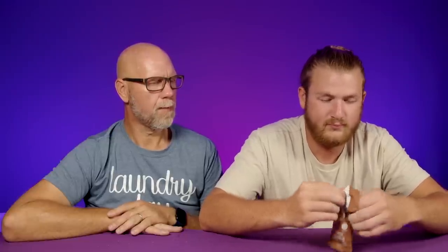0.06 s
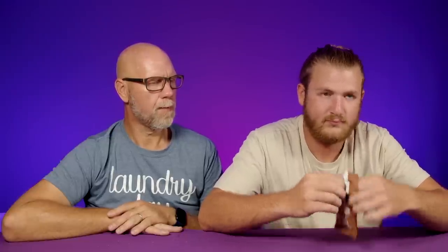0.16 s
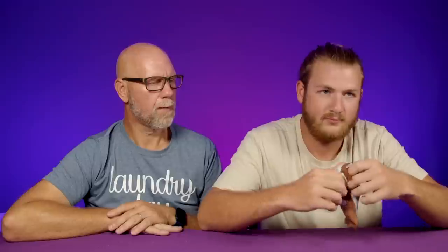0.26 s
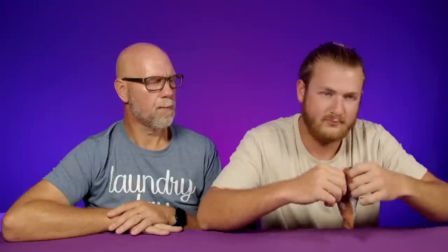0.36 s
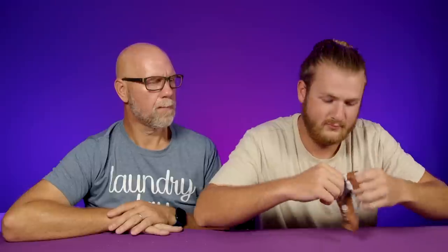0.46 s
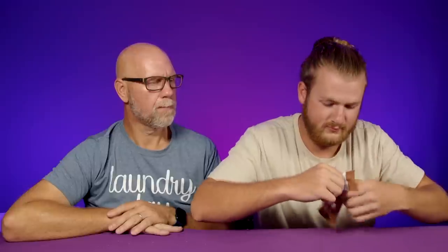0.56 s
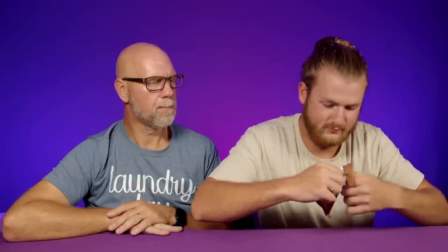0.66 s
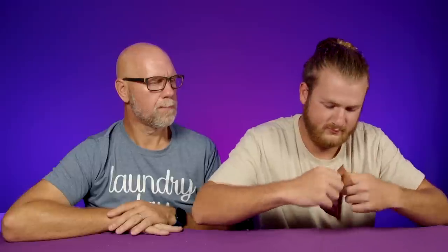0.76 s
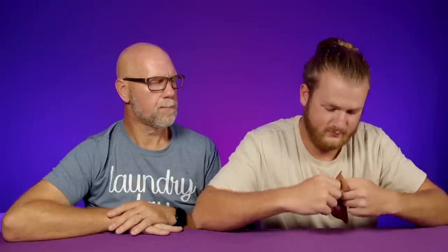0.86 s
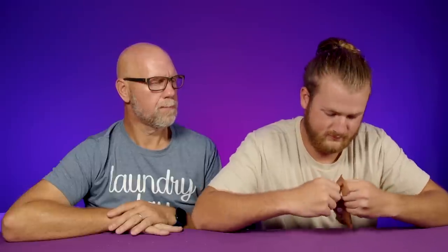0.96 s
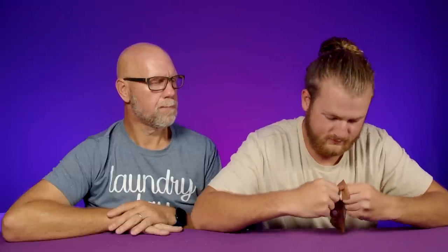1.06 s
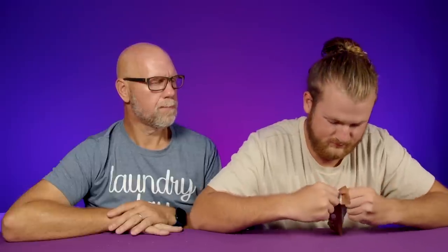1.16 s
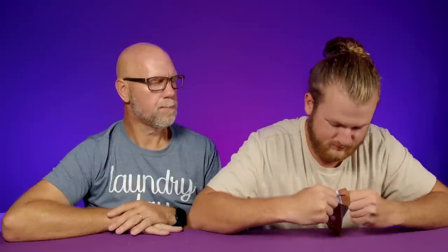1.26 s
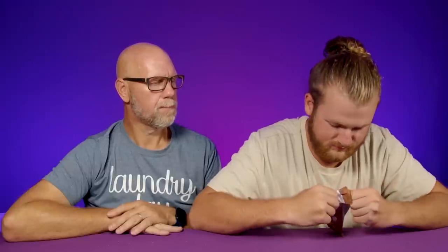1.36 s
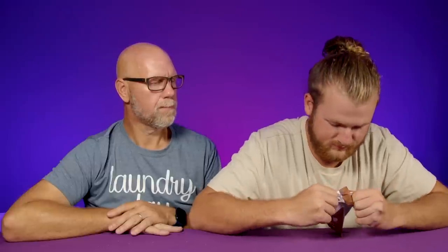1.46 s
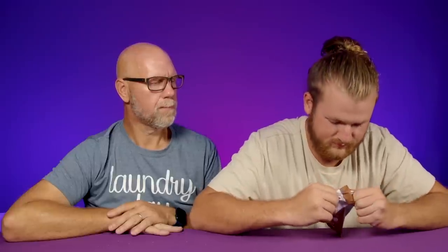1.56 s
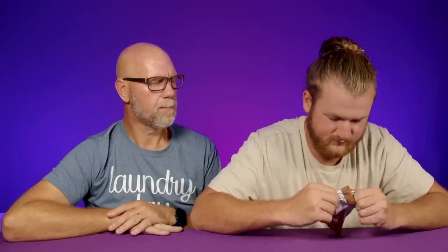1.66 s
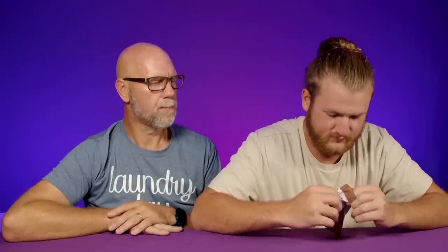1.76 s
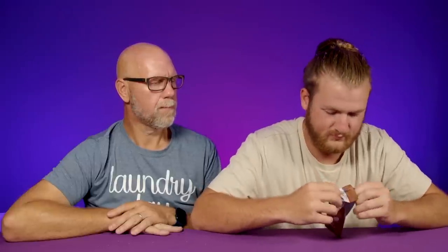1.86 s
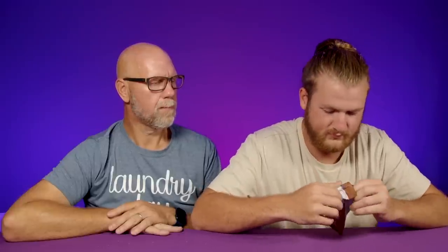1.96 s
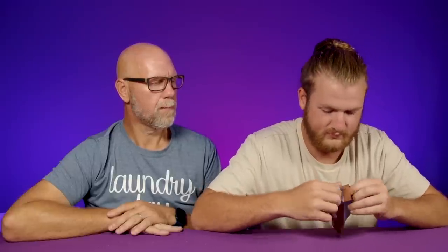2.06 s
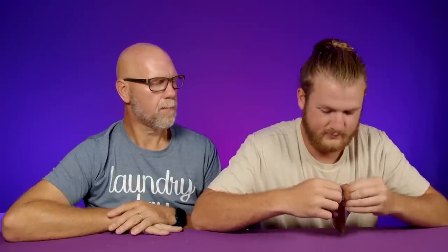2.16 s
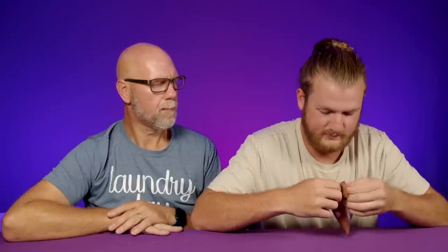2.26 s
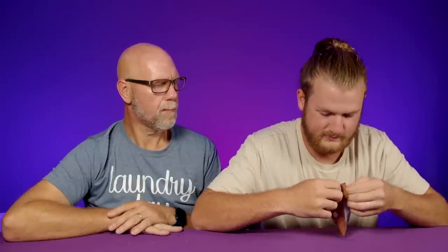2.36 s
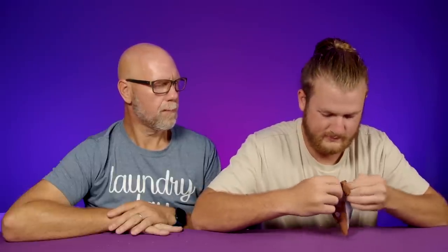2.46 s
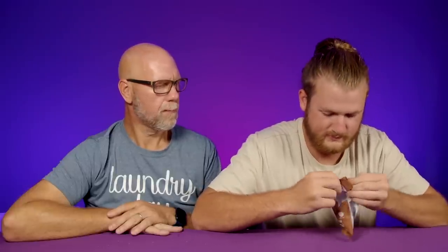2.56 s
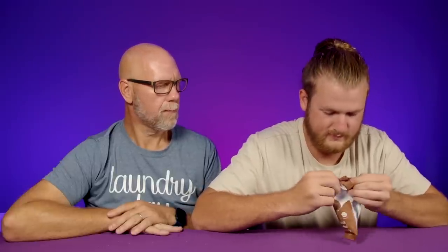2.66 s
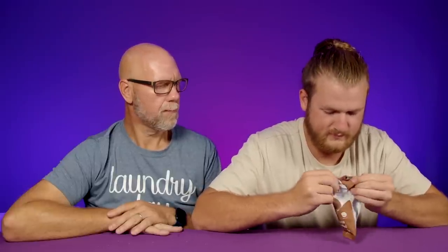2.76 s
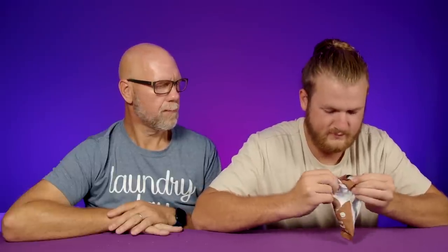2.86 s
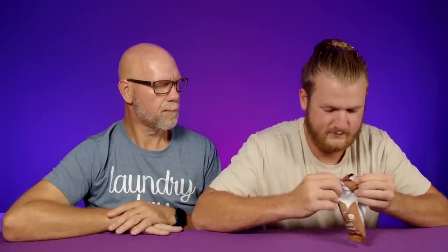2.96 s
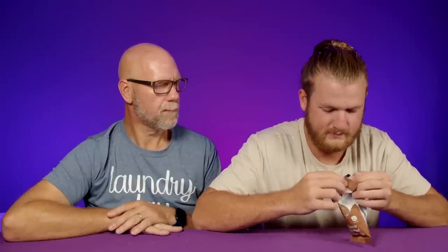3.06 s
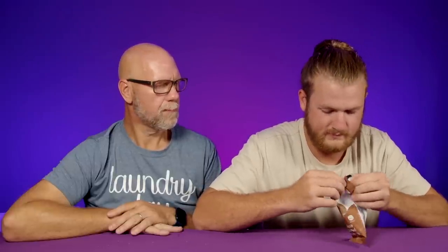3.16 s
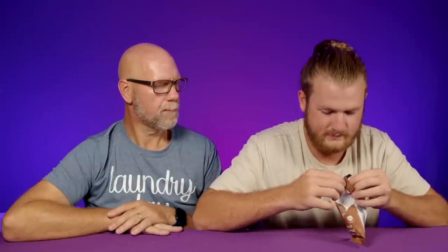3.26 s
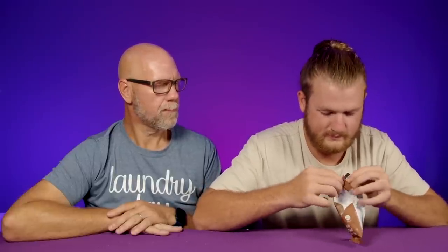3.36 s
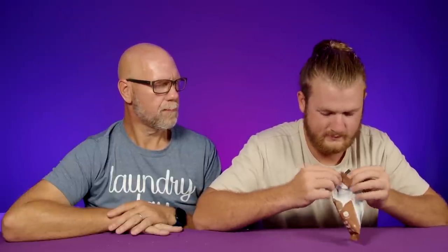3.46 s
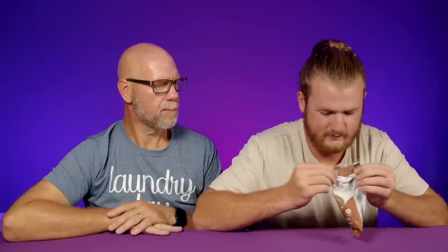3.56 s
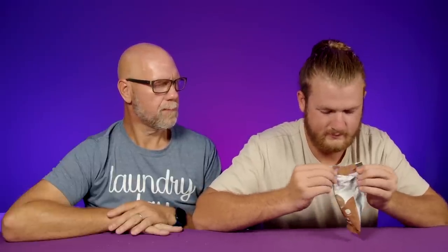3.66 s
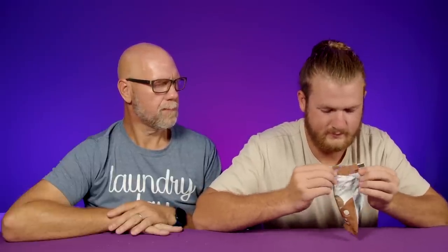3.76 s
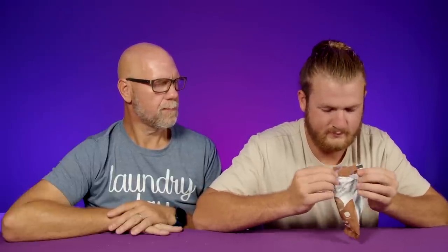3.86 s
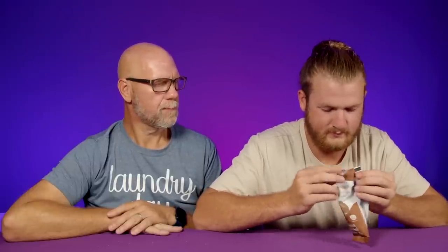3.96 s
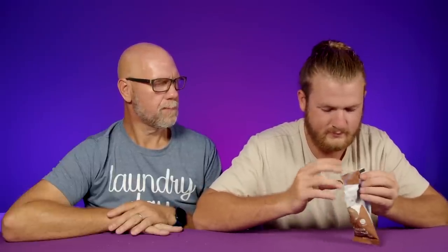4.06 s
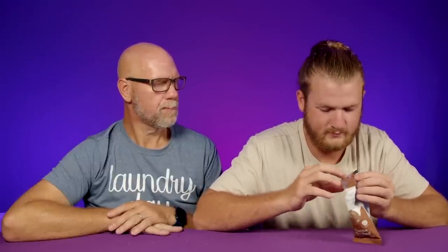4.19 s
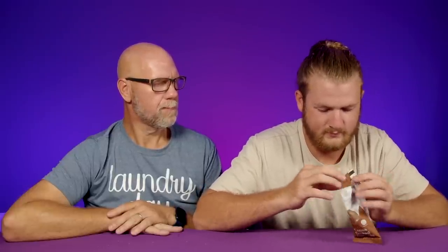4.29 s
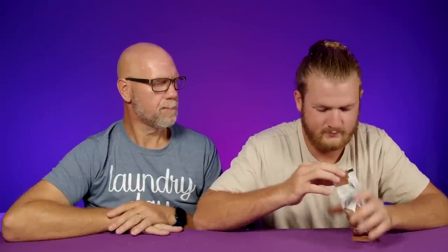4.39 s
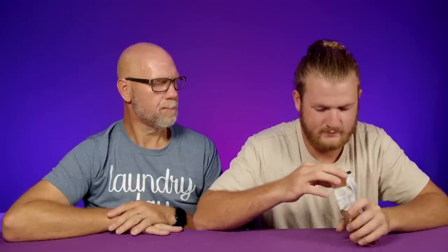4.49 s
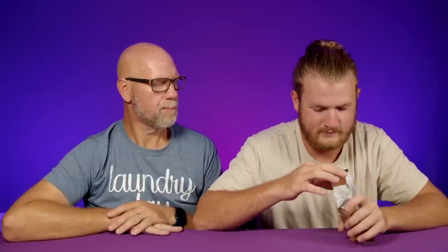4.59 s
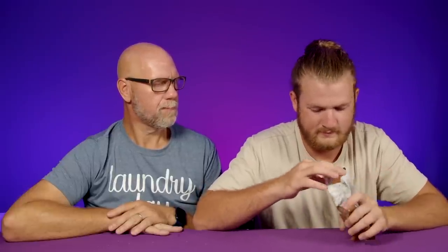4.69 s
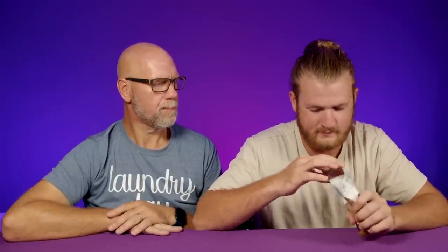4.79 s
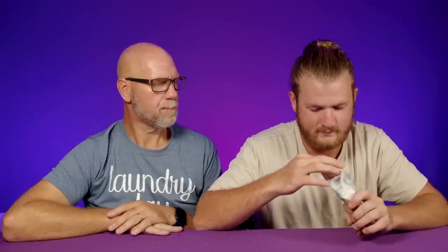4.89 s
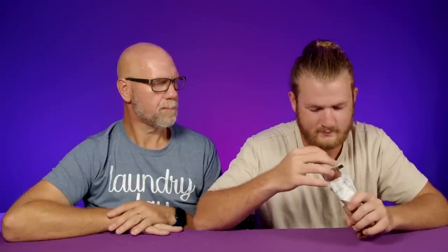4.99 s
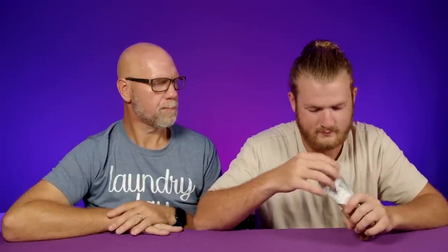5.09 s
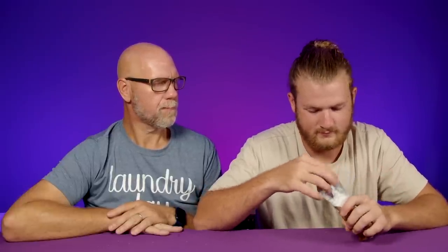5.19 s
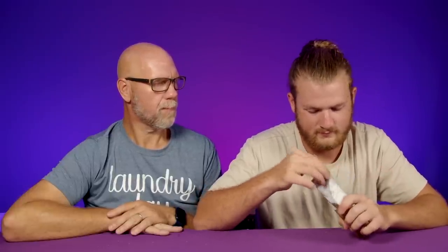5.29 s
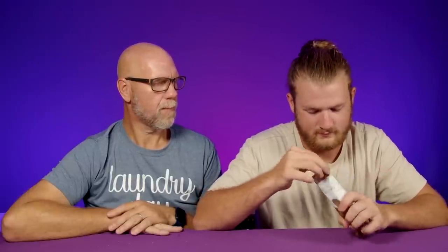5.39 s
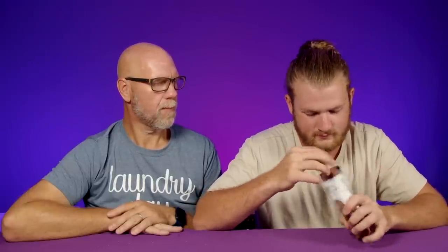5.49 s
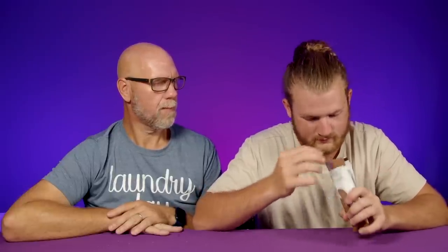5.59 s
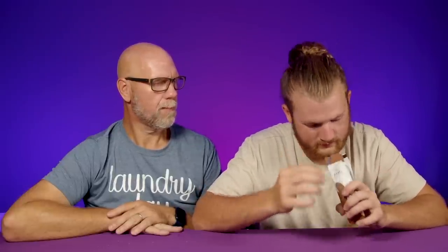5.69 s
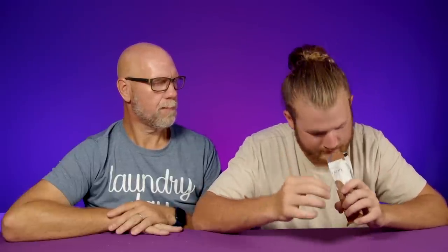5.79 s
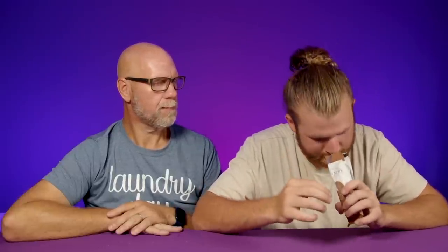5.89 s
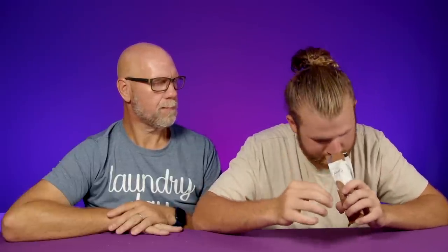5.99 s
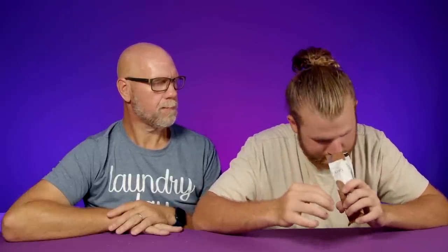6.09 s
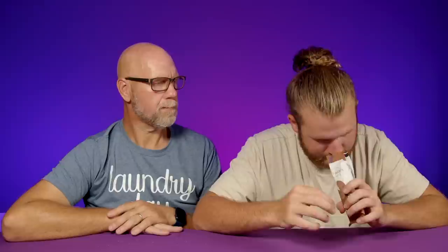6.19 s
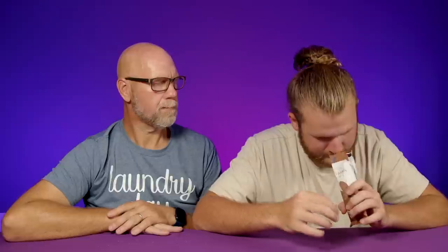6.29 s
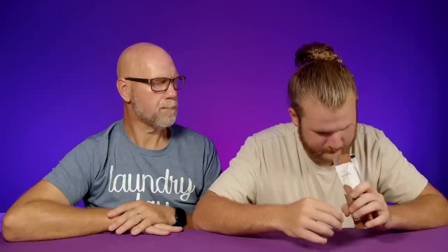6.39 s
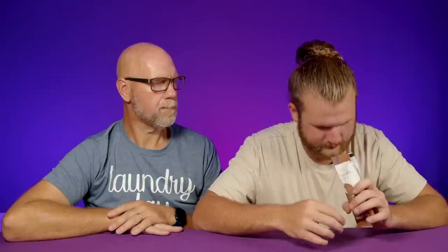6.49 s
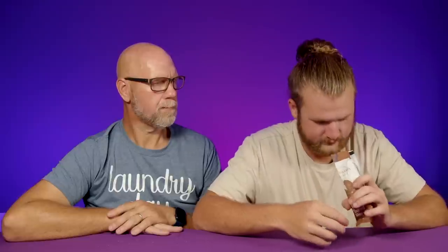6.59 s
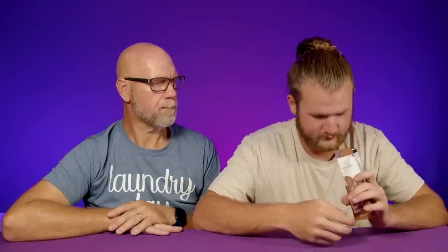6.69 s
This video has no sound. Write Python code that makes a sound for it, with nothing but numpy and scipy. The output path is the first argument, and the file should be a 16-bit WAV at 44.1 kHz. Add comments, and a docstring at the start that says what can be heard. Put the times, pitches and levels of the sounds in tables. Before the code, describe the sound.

Close to the microphone in a small room, fingers work a foil-lined snack pouch. Sharp, bright crackles and bursts of crinkling come thick at first, with duller panel pops mixed in, then grow sparser. Two quick tearing pulls near five seconds each end in a soft thud, and the handling dies to a few tiny ticks over a faint low hum.

```python
"""A foil-lined snack pouch is worked open in the hands at a table, close to a microphone in a small room.
Over rumble and a low hum the fingers crinkle the foil; creases snap one by one or buckle in runs, all as
damped rings with noise, and from about 1 s whole panels pop over. Near 4.8 s and 5.4 s two pulls tear
the top off in dense swarms of buckles, a soft thud after each; the handling then dies away to a few
ticks. Smoothed foil motion makes low puffs of air, and decaying noise makes the room's answer."""
import sys
import numpy as np
from scipy import signal
from scipy.fft import rfft, irfft, next_fast_len
from scipy.io import wavfile

SR = 44100
rng = np.random.default_rng(int(sys.argv[2]) if len(sys.argv) > 2 else 0)


def unload_wav(signal):
    """Save mono or channel-first audio to the path in sys.argv[1] as 16-bit WAV at rate SR, clipped to [-1, 1]."""
    wavfile.write(
        sys.argv[1],
        SR,
        np.round(np.clip(np.atleast_2d(signal).T, -1, 1) * 32767).astype(np.int16),
    )


N = 297075

TOP_HZ = 16000  # band limit of the recorder, and the highest ring pitch
SNAP_S = .004  # a grain's level is its energy averaged over this time

# single creases snapping, levels before each layer's trim:
# (time [s], level [dB], ring pitch [Hz], panel flex re ring [dB], fold crack re ring [dB])
SNAPS = [(0.0325, -14.5, 3620, -18.5, -17), (0.0691, -16.5, 3800, -10, -16), (0.1309, -12, 3700, -25, -16),
         (0.1581, -12.5, 3920, -12.5, -20), (0.2054, -19, 4720, -25, -11.5), (0.2725, -16, 4860, -20, -17),
         (0.301, -19, 3930, -40, -18.5), (0.3353, -17, 3900, -20, -14), (0.406, -10.5, 4310, -19.5, -30.5),
         (0.4551, -20.5, 4410, -12.5, -4), (0.4981, -19, 5450, -25, -11.5), (0.5948, -19, 3980, -13, -15),
         (0.631, -16.5, 4520, -17.5, -17.5), (0.7214, -17, 3857, -22.5, -19),
         (0.7468, -19.5, 3600, -33, -23), (0.77, -21, 4030, -19, -12), (0.8087, -9, 3437, -17.5, -28.5),
         (0.9231, -17.5, 6600, -23, -17.5), (0.9563, -16.5, 3800, -22, -14.5),
         (1.0196, -13.5, 5170, -24, -23), (1.066, -18, 7262, -24, -9.5), (1.0777, -14, 3949, -26.5, -17.5),
         (1.1452, -26, 4700, -5, -23.5), (1.1698, -9.5, 5100, -19, -36.5),
         (1.2016, -12.5, 3610, -15.5, -20.5), (1.255, -14, 3809, -32, -10), (1.3014, -12.5, 4930, -25, -25),
         (1.4458, -15.5, 3950, -32.5, -24), (1.5881, -17.5, 3180, -36, -24),
         (1.6118, -12, 3752, -18, -18.5), (1.6903, -22.5, 4740, -13, -21), (1.711, -25.5, 4464, -5, -26.5),
         (1.7589, -25, 3162, -26.5, -13.5), (1.8529, -20.5, 4002, -11.5, -13), (1.8893, -22, 5210, -20, -9),
         (1.9828, -19, 4000, -16.5, -13.5), (2.0489, -22, 4753, -11, -32.5),
         (2.0766, -18.5, 4200, -25, -26), (2.1167, -16.5, 4630, -20, -16.5),
         (2.1417, -19, 3868, -16, -24.5), (2.2084, -26, 4598, -15, -20), (2.3116, -28, 7060, -18, -5.5),
         (2.3365, -32.5, 5437, -6, -16.5), (2.386, -17.5, 3762, -24, -21.5),
         (2.405, -28.5, 4520, -3.5, -22.5), (2.4316, -18, 4840, -20, -23),
         (2.5117, -11.5, 3940, -11.5, -26), (2.6356, -21, 4515, -14.5, -17),
         (2.7087, -12.5, 3056, -11, -24.5), (2.909, -24.5, 4153, -30, -5.5), (2.9557, -20, 3691, -33, -7.5),
         (3.1604, -15.5, 3600, -28.5, -29), (3.457, -20, 4237, -23, -8), (3.5557, -19.5, 4326, -37, -23.5),
         (3.7527, -26.5, 4970, -22, -15), (3.7653, -20.5, 4770, -16, -13),
         (3.7876, -23.5, 3730, -13, -18.5), (3.9295, -24, 4980, -26, -12),
         (4.0579, -21.5, 3130, -11.5, -17.5), (4.0991, -21.5, 3554, -17, -17),
         (4.337, -22, 4517, -10, -18.5), (4.362, -25.5, 5480, -22.5, -19.5),
         (4.4593, -23.5, 5314, -12.5, -11), (4.5473, -20.5, 2509, -12, -20),
         (4.7614, -18.5, 4980, -15.5, -19.5), (4.9629, -22, 3690, -30.5, -10),
         (4.989, -21.5, 5513, -8, -16.5), (5.1957, -31, 4812, -22.5, -16.5),
         (5.5233, -19.5, 4603, -31, -13.5), (5.6661, -31, 3300, -7, -20), (5.7143, -35.5, 4050, -4, -25.5),
         (5.8513, -46, 4960, -13, -19), (5.9737, -30.5, 4240, -17, -20), (6.1623, -42, 4950, -7.5, -14),
         (6.2333, -55, 3210, -28, -25), (6.2627, -55.5, 3590, -10, -30), (6.484, -57.5, 3550, -8, -27),
         (6.5211, -63, 4400, -1, -24)]
# pulls that tear the top off:
# (start [s], seam gives [s], end [s], level as the seam gives [dB], panel flex re ring [dB], crack re ring [dB])
TEARS = [(4.777, 4.845, 4.875, -26.5, -3.5, -6.5), (5.338, 5.378, 5.435, -28.5, -2, -9.5)]


def amp(db):
    """Decibels to gain."""
    return 10 ** (np.asarray(db) / 20)


def unit(x):
    """Scale to rms 1."""
    return x / np.sqrt(np.mean(x ** 2) + 1e-20)


def along(points, hz):
    """Interpolate (frequency [Hz], value) points on a log frequency axis."""
    f, v = np.transpose(points)
    return np.interp(np.log(hz + 1), np.log(f + 1), v)


def curves(rows, when):
    """Each column of a curve table at the given times."""
    s, *cols = np.transpose(rows)
    return [np.interp(when, s, c) for c in cols]


def filtered(x, response):
    """Multiply the spectrum of x by a response of frequency."""
    m = next_fast_len(N + SR // 2)
    return irfft(rfft(x, m) * response(np.fft.rfftfreq(m, 1 / SR)), m)[:N]


def coloured(x, points, size=2048):
    """Minimum-phase filter with the given (frequency [Hz], level [dB]) shape, so that attacks stay sharp."""
    cepstrum = irfft(np.log(amp(along(points, np.fft.rfftfreq(size, 1 / SR)))))
    # fold the cepstrum onto positive time: the filter becomes causal
    cepstrum[1:size // 2] *= 2
    cepstrum[size // 2 + 1:] = 0
    impulse = irfft(np.exp(rfft(cepstrum)))
    return signal.fftconvolve(x, impulse)[:N]


def high_passed(x, hz):
    """A small radiator gives little below its own pitch."""
    return signal.sosfilt(signal.butter(2, hz, "high", fs=SR, output="sos"), x)


def low_passed(x, hz, order):
    """A slow or soft motion gives little above its corner."""
    return signal.sosfilt(signal.butter(order, hz, fs=SR, output="sos"), x)


def moments(rate):
    """Irregular times over the whole scene, rate a second."""
    slots = np.arange(int(N * rate / SR))
    return (slots + 2 * rng.random(len(slots))) / rate


def placed(when, waves):
    """Sum one short wave per row at its time."""
    first = np.round(np.abs(when) * SR).astype(int)[:, None]
    index = first + np.arange(waves.shape[1])
    return np.bincount(index.ravel(), waves.ravel(), N)[:N]


def grains(when, db, hz, life, rough, echo_db, rise=.00005, size=230):
    """Damped rings, partly noisy, each repeated within about a millisecond by the pouch's far wall."""
    t = np.arange(size) / SR
    lag = rng.uniform(0.0003985, 0.001142, (len(when), 1))
    sign = rng.choice([-1, 1], (len(when), 1))
    pitch = np.minimum(hz, TOP_HZ)[:, None]

    def ring(u):
        envelope = np.exp(-u / life) * (1 - np.exp(-u / rise))
        return envelope * np.sin(2 * np.pi * pitch * u)

    echo = amp(echo_db) * ring(np.maximum(t - lag, 0))
    rattle = np.exp(-t / life / 2) * rng.standard_normal((len(when), size))
    waves = sign * (ring(t) + echo) + rough * rattle
    waves /= np.sqrt(np.sum(waves ** 2, 1, keepdims=True) / (SNAP_S * SR))
    return placed(when, waves * amp(db)[:, None])


def buckles(when, db, hz, flex_db, crack_db):
    """A crease flips: its facet rings, the panel around it flexes, and the sharp fold cracks."""
    flex_pitch, crack_pitch = rng.standard_normal((len(when), 2)).T
    flex_hz = 1400 * np.exp(.42 * flex_pitch)
    crack_hz = 10500 * np.exp(.22 * crack_pitch)
    ring = grains(when, db, hz, life=0.00034, rise=0.000063, rough=0.056, echo_db=-5.0)
    flex = grains(when, db + flex_db, flex_hz, life=.00055, rough=0.24, echo_db=-7)
    flex = low_passed(flex, 3100, order=2)  # broad panels move too slowly for treble
    crack = grains(when, db + crack_db, crack_hz, life=0.00011, rough=0.47, echo_db=1.0)
    return high_passed(ring, 2380) + high_passed(flex, 240) + high_passed(crack, 3900)


def swarm(when, db, flex_db, crack_db, rate, spread_db, droop=0.013, clump_db=4.0, clumps_per_s=70):
    """Tiny buckles of uneven size and pitch, rate a second, in clumps that together reach the given level."""
    size_db = spread_db * rng.random(len(when)) ** 3  # mostly small, few large
    clump = (np.abs(when) * clumps_per_s).astype(int)
    size_db += clump_db * rng.uniform(-1, 1, N)[clump]
    size_db -= 10 * np.log10(np.mean(amp(size_db) ** 2) * rate * SNAP_S)
    pitch, flex, crack = rng.standard_normal((len(when), 3)).T
    hz = 3900 * np.exp(.29 * pitch - droop * flex_db)  # the more the panels flex, the wider and lower the facets
    return buckles(when, db + size_db, hz, flex_db + 2.0 * flex, crack_db + 3 * crack)


def room_tone(hum_hz=191, width_hz=4, hum_db=-4):
    """Low rumble with a wavering hum, a sine plus narrow-band noise; the recorder's gate turns both down at the end."""
    # level of the rumble, the gate's turn-down drawn into its last points: (time [s], level [dB])
    tone_level = [(0, -65), (5.6, -65.5), (6.18, -69), (6.32, -80.5), (6.74, -78.5)]
    # spectral shape of the rumble: (frequency [Hz], relative level [dB])
    tone_colour = [(20, -6), (60, -2), (100, -4.5), (160, -2), (260, -15.5), (600, -21.5), (1500, -27.5),
                   (4000, -32.5), (15000, -37.5)]
    rumble = unit(filtered(rng.standard_normal(N), lambda hz: amp(along(tone_colour, hz)) * (hz > 15)))
    waver = unit(filtered(rng.standard_normal(N), lambda hz: 1 / (1 + ((hz - hum_hz) / width_hz) ** 2)))
    t = np.arange(N) / SR
    hum = unit(np.sin(2 * np.pi * hum_hz * t) + 0.79 * waver)
    level_db, = curves(tone_level, t)
    return amp(level_db) * (rumble + amp(hum_db) * hum)


def handling(rate=520, trim_db=-5.5):
    """The fingers keep the foil crinkling lightly under and between the louder runs."""
    # finger crinkle, levels before the trim: (time [s], ring level [dB], panel flex level [dB])
    finger_levels = [(0.0, -34, -37.5), (0.33, -37, -46.5), (0.69, -40, -46), (0.82, -38, -40.5),
                     (1.18, -37, -50.5), (1.48, -40, -47.5), (1.61, -38, -50), (1.87, -45.5, -53.5),
                     (2.27, -39, -48), (2.48, -37.5, -52.5), (2.86, -36.5, -60), (3.01, -35, -43.5),
                     (3.22, -47.5, -57.5), (3.43, -39.5, -50), (3.62, -38.5, -58), (3.86, -43, -52.5),
                     (4.09, -54, -54), (4.62, -41.5, -51.5), (4.8, -45, -52), (5.04, -58.5, -73),
                     (5.24, -55, -53), (5.39, -48.5, -50), (5.47, -46, -55), (5.55, -47, -62),
                     (5.75, -72, -79), (5.9, -89, -94)]
    when = moments(rate)
    when = when[when < finger_levels[-1][0]]
    ring_db, panel_db = curves(finger_levels, when)
    flex_db = panel_db - ring_db
    return swarm(when, ring_db + trim_db, flex_db, crack_db=-9.5, rate=rate, spread_db=19.0)


def colour_peaks(x, gain_db=-4.0):
    """Fixed colour peaks, as from the table top's reflection: a sum of narrow band-pass responses."""
    # peaks, levels before the gain: (centre [Hz], width [Hz], level [dB])
    peak_bands = [(544, 30, -3), (671, 27, -4), (775, 32, -3), (936, 50, -6), (1078, 50, -7),
                  (1166, 27, -7), (1417, 32, -7), (1575, 45, -5), (1757, 25, -7), (2498, 27, -4)]

    def response(f):
        return sum(amp(db) * 1j * f * w / (c * c - f * f + 1j * f * w) for c, w, db in peak_bands)

    return amp(gain_db) * filtered(x, response)


def puffs(foil, push_db, soft_hz, corner_hz=22):
    """Every flip also shifts the air in the pouch: a sudden low push that follows the foil's motion."""
    push = low_passed(np.abs(foil), corner_hz, order=1)
    push = low_passed(push, soft_hz, order=1)
    return amp(push_db) * high_passed(push, 6.1)


def room(x, tail_db=-7.5, near_db=-2.0, count=24):
    """Near surfaces answer first, then a diffuse tail; both change as the pouch moves about."""
    # decay of the small room: (frequency [Hz], time to fall 60 dB [s])
    decay_times = [(150, 1), (600, 0.47), (2000, 0.48), (4500, 0.56), (8000, 0.45), (15000, 0.25)]
    # table top and the holder's chest, before jitter and near_db: (delay [s], level [dB])
    near_surfaces = [(.0024, -20), (.0039, -12.5), (.0047, -11), (.0078, -21.5), (.0093, -22.5)]
    wet = np.zeros(N + 2 * SR)
    place = np.arange(N) / N * (count - 1)  # position along the successive answers
    for k in range(count):
        hz, t, z = signal.stft(rng.standard_normal(SR // 2), SR, nperseg=256)
        decay = amp(-60 * t / along(decay_times, hz)[:, None])
        onset = 1 - np.exp(-t / 0.00068)
        tail = signal.istft(z * decay * onset, SR, nperseg=256)[1]
        answer = amp(tail_db) * tail / np.linalg.norm(tail)
        for delay_s, db in near_surfaces:
            first = round(delay_s * SR * rng.uniform(.9, 1.1))
            answer[first:][:2] += amp(db + near_db) / 2  # two taps: a soft surface
        near = np.nonzero(np.abs(place - k) < 1)[0]
        fade = np.cos(np.pi / 2 * (place[near] - k))  # crossfade between neighbouring answers
        part = signal.fftconvolve(x[near] * fade, answer)
        wet[near[0]:][:len(part)] += part
    return wet[:N]


def snaps(first_db=-15.0, next_db=-18.0, fade_db=2.0, step_s=.0009, detune=.22,
          panel_db=6.5, fold_db=10.0, delay_s=.0008, count=3):
    """The larger creases: each flips and tips a few neighbouring facets over, one after another and ever weaker."""
    when, db, hz, flex_db, crack_db = np.transpose(SNAPS)

    def flip(s, level_db, ring_hz):
        return buckles(s + delay_s, level_db, ring_hz, flex_db + panel_db, crack_db + fold_db)

    out = flip(when, db + first_db, hz)
    for k in range(count):
        when = when + step_s * (.5 + rng.random(len(when)))
        neighbour_hz = hz * np.exp(detune * rng.standard_normal(len(when)))
        out = out + flip(when, db + next_db - fade_db * k, neighbour_hz)
    return out


def thumps(level_db=-34.5, thump_hz=240):
    """A snapping crease also jolts the whole wall of the pouch, a short dull knock."""
    when, db = np.transpose(SNAPS)[:2]
    pitch = thump_hz * np.exp(.3 * rng.standard_normal(len(when)))
    return grains(when + 0.00091, db + level_db, pitch, life=.0016, rough=.01, echo_db=-12.5, rise=.0003, size=500)


def crumples(rate=1100, gain_db=-3.5, attack_s=0.002, sag_db=4.5):
    """Runs of tiny grains, each with a quick attack, then a slow sag: squeezes, and last a bright room ring."""
    # squeezes, and last the room's bright ring after the 5.97 s snap; levels before the gain:
    # (start [s], end [s], level [dB], panel flex re ring [dB], crack re ring [dB])
    grain_runs = [(0.06, 0.08, -31, -4.5, -11), (0.101, 0.164, -30, -4, -2.5),
                  (0.209, 0.306, -34, -3.5, -14), (0.338, 0.37, -28.5, -7, -14),
                  (0.456, 0.544, -31, -4.5, -11.5), (0.59, 0.665, -27.5, -7.5, -11.5),
                  (0.717, 0.757, -27, -11, -13), (0.811, 0.867, -42.5, 1.5, -18.5),
                  (0.985, 1.104, -32.5, -9.5, -6.5), (1.202, 1.249, -32.5, -5.5, -12),
                  (1.266, 1.309, -23.5, -12, -7), (1.466, 1.539, -25, -12, -7.5),
                  (1.8, 1.839, -34, -8.5, -8.5), (1.872, 1.923, -30, -9, -13),
                  (2.197, 2.256, -29.5, -10, -7.5), (2.529, 2.563, -38, -17.5, 3.5),
                  (2.654, 2.819, -35, -6, -5), (2.829, 3.017, -36.5, -11, -1),
                  (3.073, 3.135, -32.5, -9, -5.5), (3.204, 3.229, -35, -9.5, -6),
                  (3.544, 3.668, -34, -5.5, -3), (3.745, 3.8, -33, -5.5, -4.5), (3.954, 4.007, -38, -7, -5),
                  (4.24, 4.313, -42.5, -2, -4.5), (4.315, 4.372, -34.5, -9, -8),
                  (4.578, 4.667, -37, -9, -4.5), (4.951, 5.012, -35, -5, -10.5),
                  (5.174, 5.261, -42, -6.5, -6), (5.293, 5.341, -40.5, -4, -3),
                  (5.519, 5.586, -35, -5, -7.5), (5.978, 6.061, -56.5, -17, -25)]
    start, end = np.transpose(grain_runs)[:2]
    when = moments(rate)
    grain, run = np.nonzero((when[:, None] > start) & (when[:, None] < end))
    start, end, db, flex_db, crack_db = np.array(grain_runs)[run].T
    age = when[grain] - start
    attack_db = 20 * np.log10(1 - np.exp(-age / attack_s))
    shape_db = attack_db - sag_db * age / (end - start)
    return swarm(when[grain], db + gain_db + shape_db, flex_db, crack_db, rate, spread_db=14.0)


def pops(gain_db=-6.5):
    """A whole panel turns over without a sharp crease, a duller, rounder sound."""
    # panels popping over, levels before the gain: (time [s], level [dB], pitch [Hz])
    panel_pops = [(0.908, -31.5, 2070), (1.05, -26, 1035), (1.218, -26, 902), (1.295, -23, 1089),
                  (1.399, -31.5, 1130), (2.163, -33, 928), (2.323, -32, 1576), (2.84, -34.5, 2149),
                  (3.055, -36, 1573), (4.141, -44, 1572), (4.216, -44.5, 1604), (5.216, -36.5, 1437),
                  (5.574, -30.5, 1426), (6.505, -62, 1550)]
    when, db, hz = np.transpose(panel_pops)
    popped = grains(when, db + gain_db, hz, life=.0017, rough=.08, echo_db=0.5, rise=0.00026, size=400)
    return high_passed(popped, 400)


def tears(rate=1300, spread_db=12.5, swell_db=12.5, drum_db=-25.5, drum_hz=115):
    """The tear swells as the pull builds and ebbs once the seam gives; the taut pouch drums along."""
    start, _, end = np.transpose(TEARS)[:3]
    when = moments(rate)
    grain, pull = np.nonzero((when[:, None] > start) & (when[:, None] < end))
    when = when[grain]
    start, gives, end, db, flex_db, crack_db = np.array(TEARS)[pull].T
    before, after = (gives - when) / (gives - start), (when - gives) / (end - gives)
    db = db - swell_db * np.maximum(before, after)
    pitch = drum_hz * np.exp(0.38 * rng.standard_normal(len(when)))
    drum = grains(when, db + drum_db, pitch, life=.003, rough=.01, echo_db=-16, rise=.001, size=900)
    return swarm(when, db, flex_db, crack_db, rate, spread_db) + drum


def recoil(level_db=-53.5, delay_s=.06, width_s=0.045, corner_hz=75):
    """The hands jerk apart after each tear, with a soft low thud of noise."""
    t = np.arange(N) / SR
    thud = unit(filtered(rng.standard_normal(N), lambda hz: (hz > 20) / (1 + (hz / corner_hz) ** 4)))
    swell = sum(np.exp(-((t - gives - delay_s) / width_s) ** 2) for _, gives, *_ in TEARS)
    return amp(level_db) * thud * swell


def scene():
    """The pouch, its room and the room tone; big snaps shift the most air."""
    # how the pouch radiates: (frequency [Hz], level [dB])
    foil_response = [(100, -14), (300, -4.5), (600, 0), (1100, -3), (1700, 0.5), (2500, -0.5), (3900, 1.5),
                     (5500, 0.5), (7500, 2.5), (10000, 0.5), (13500, -1.5), (16000, -5)]
    big = snaps()
    small = pops() + crumples() + tears() + handling()
    foil = coloured(big + small, foil_response)
    foil = foil + colour_peaks(foil)
    air = puffs(big, push_db=-2.0, soft_hz=480) + puffs(small, push_db=-4.5, soft_hz=400)
    air = air + thumps() + recoil()
    return (foil + air + room(foil) + room_tone())[None]


def record(dry):
    """The recorder keeps nothing above its band limit."""
    return filtered(dry[0], lambda hz: hz < TOP_HZ)[None]


dry = scene()
out = record(dry)
unload_wav(out)
```